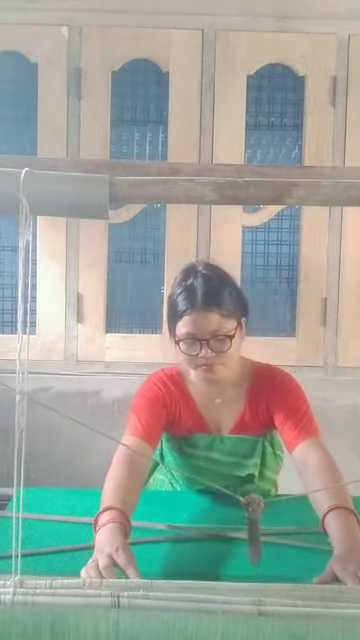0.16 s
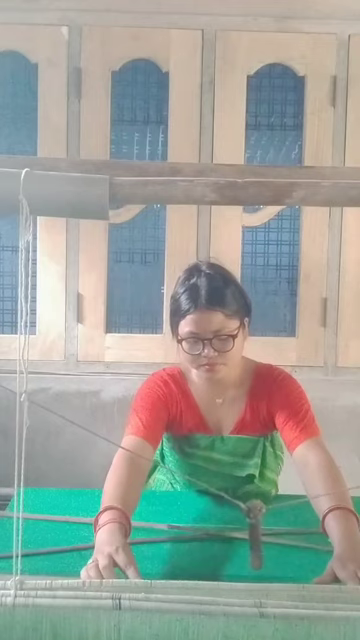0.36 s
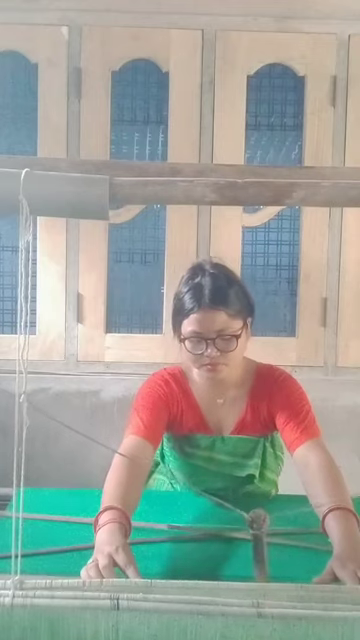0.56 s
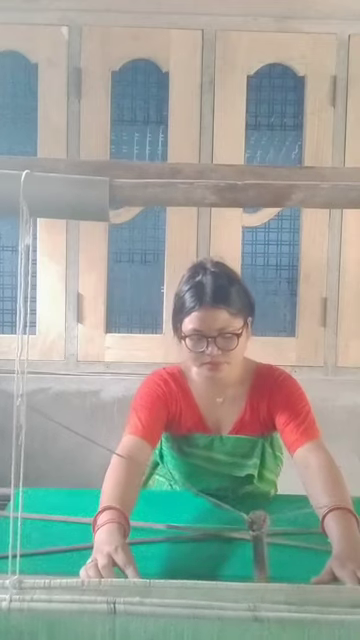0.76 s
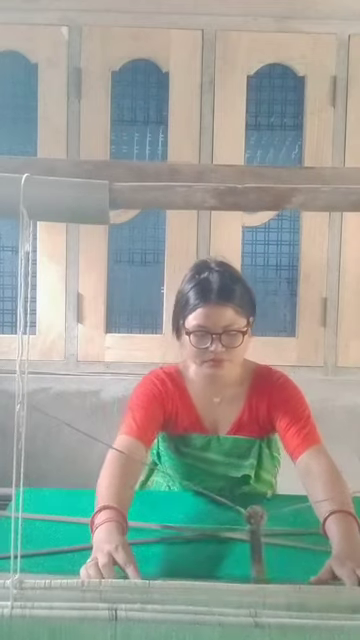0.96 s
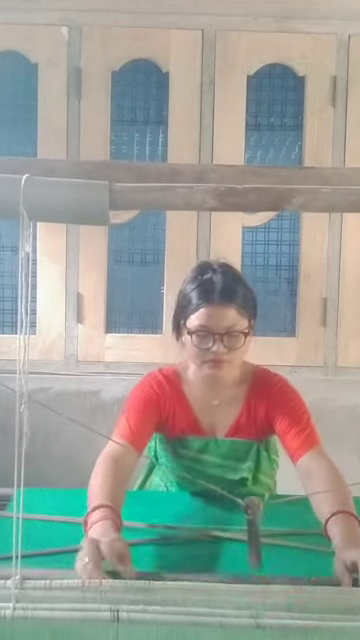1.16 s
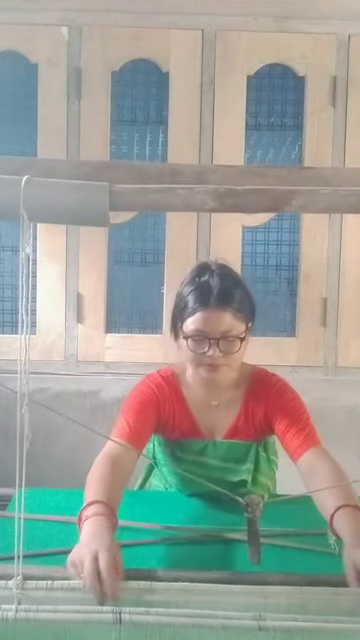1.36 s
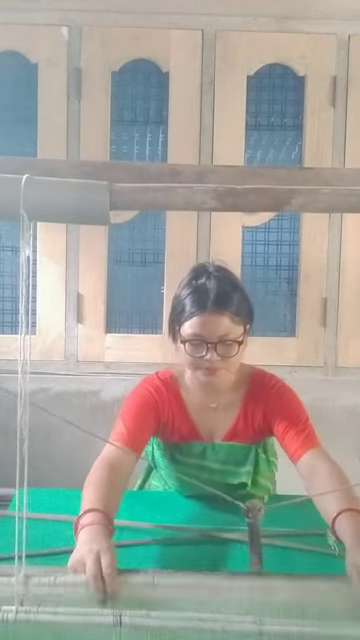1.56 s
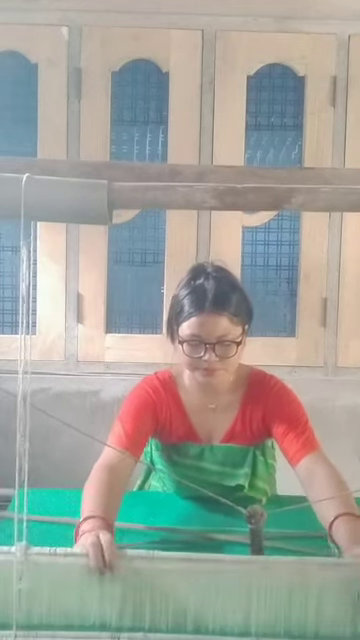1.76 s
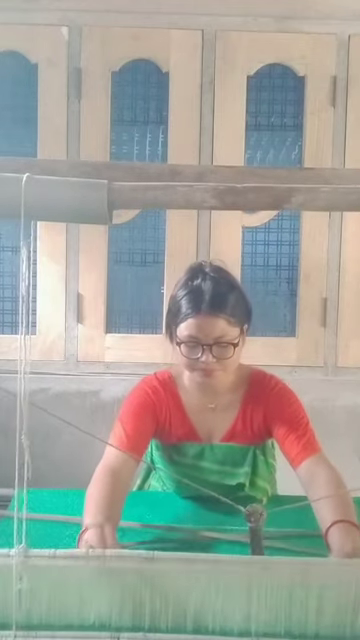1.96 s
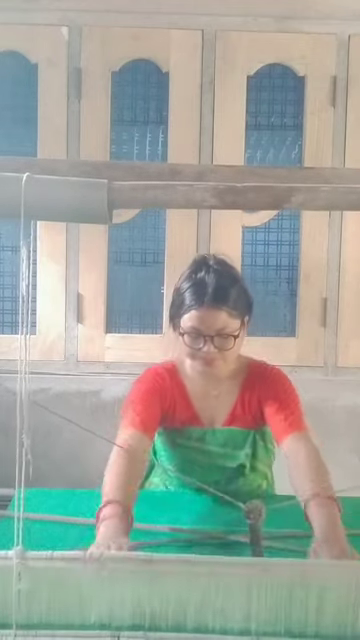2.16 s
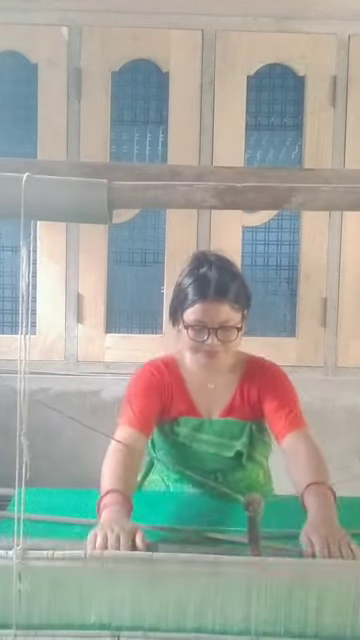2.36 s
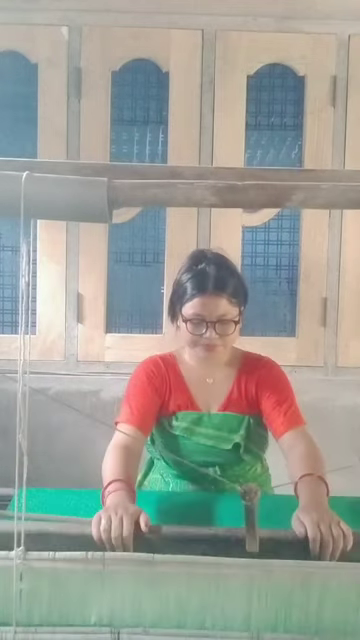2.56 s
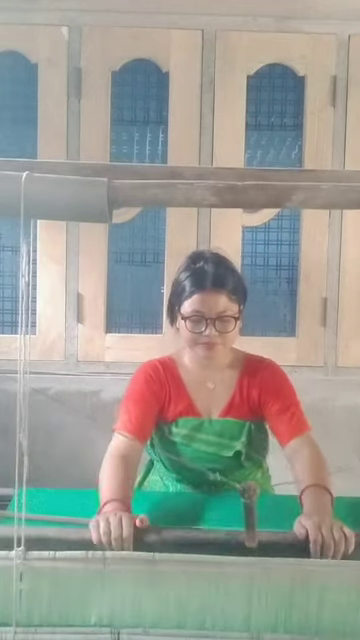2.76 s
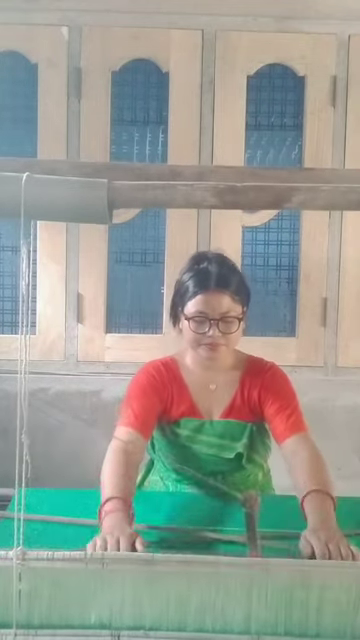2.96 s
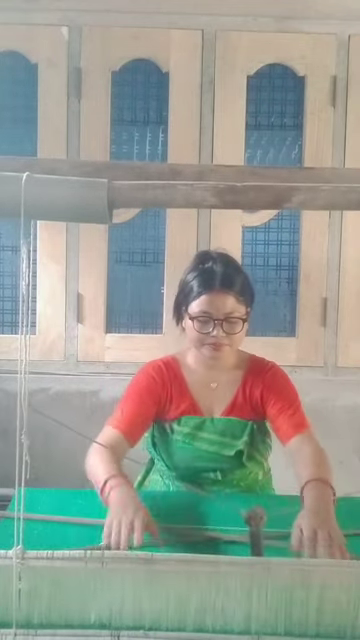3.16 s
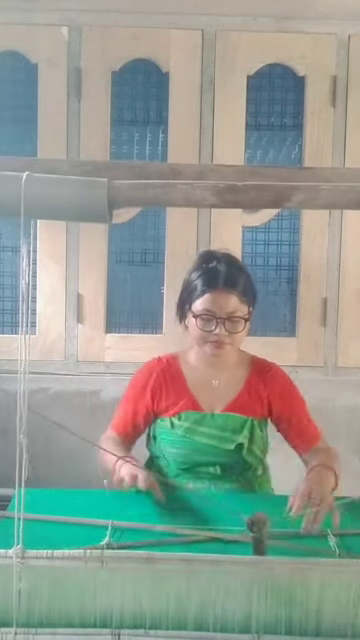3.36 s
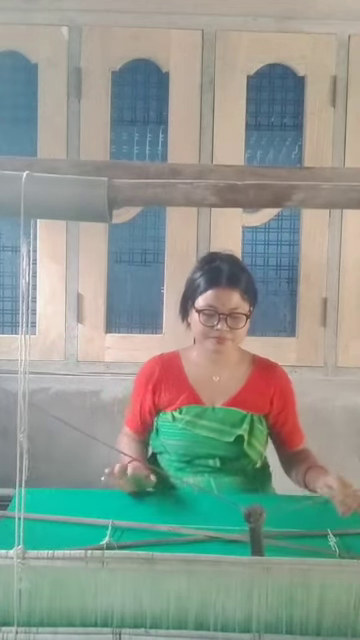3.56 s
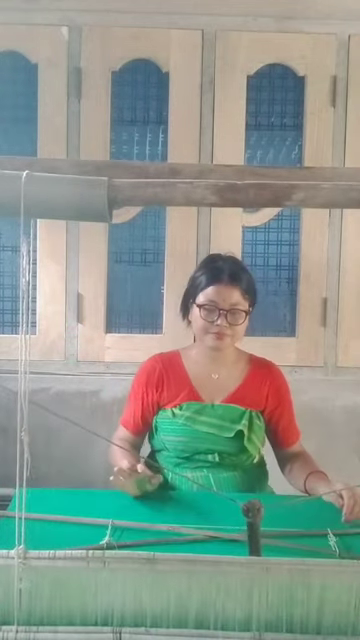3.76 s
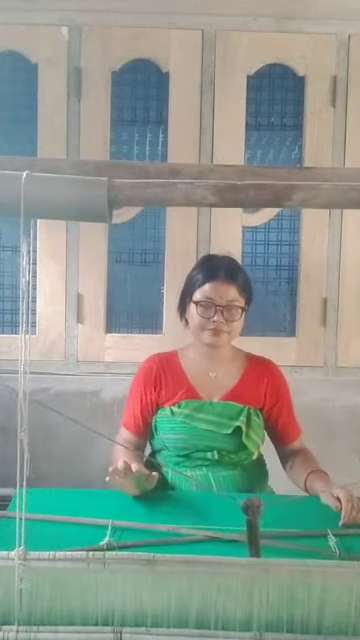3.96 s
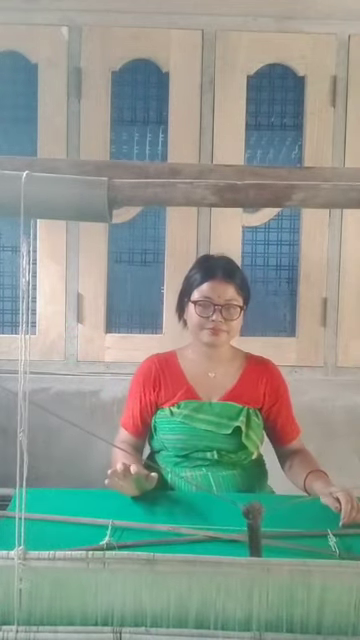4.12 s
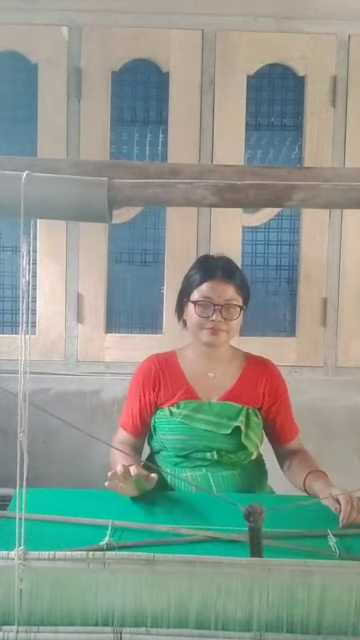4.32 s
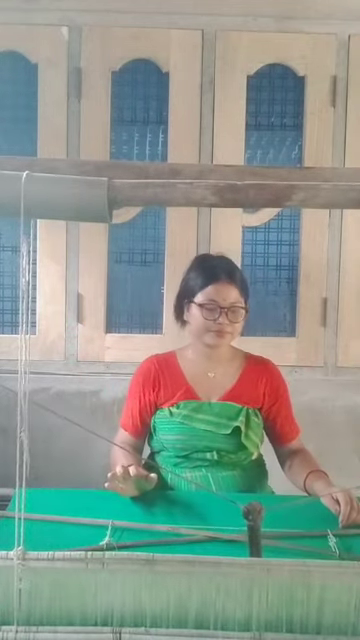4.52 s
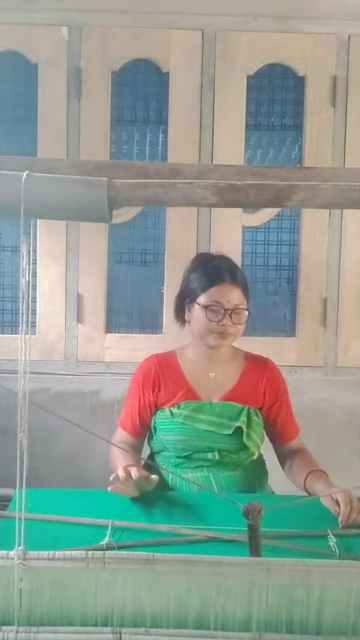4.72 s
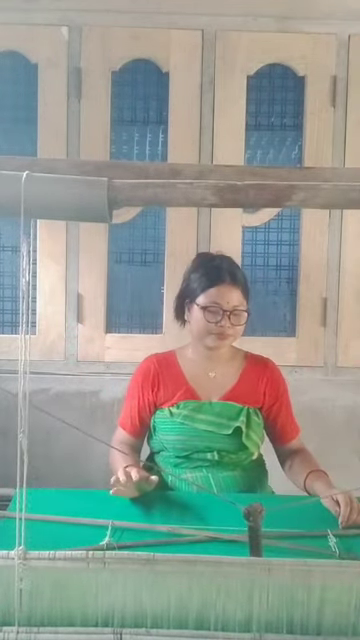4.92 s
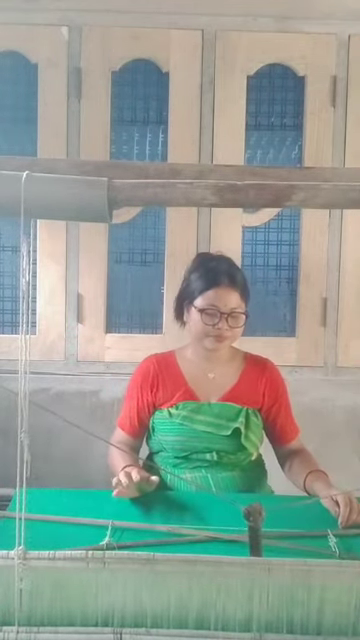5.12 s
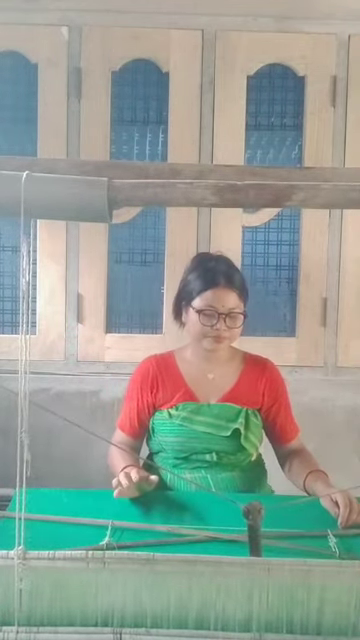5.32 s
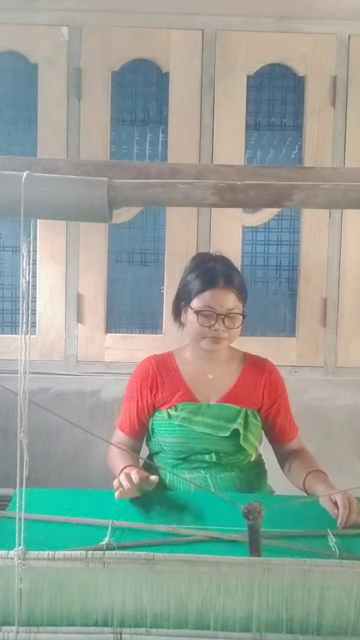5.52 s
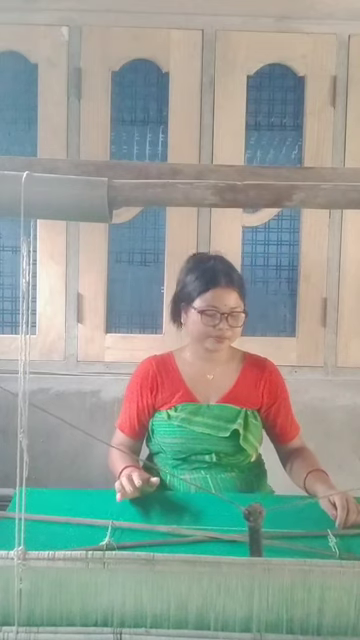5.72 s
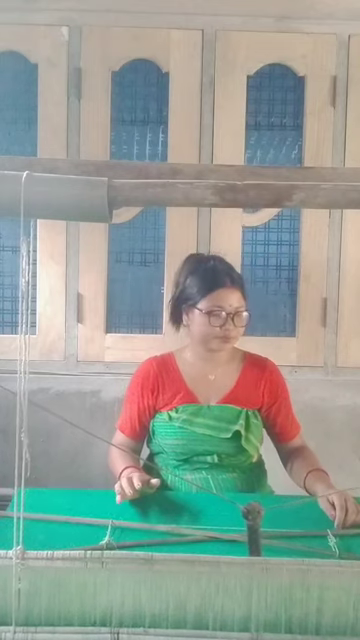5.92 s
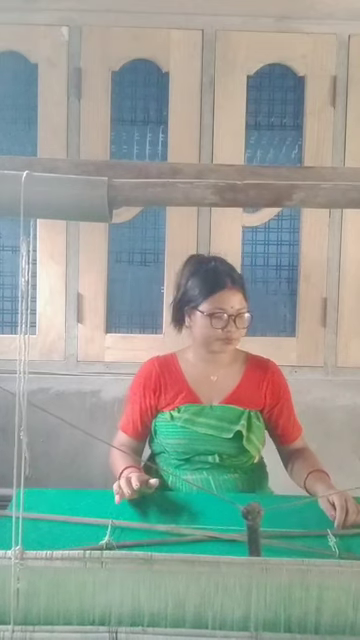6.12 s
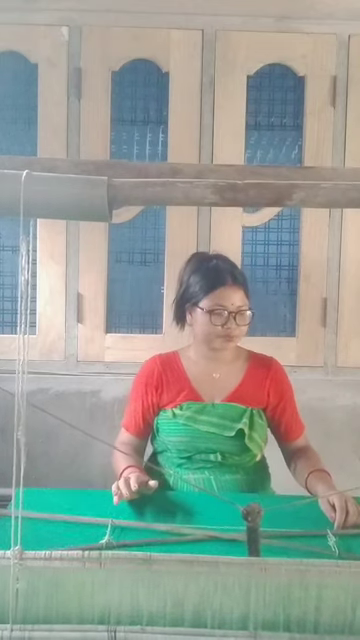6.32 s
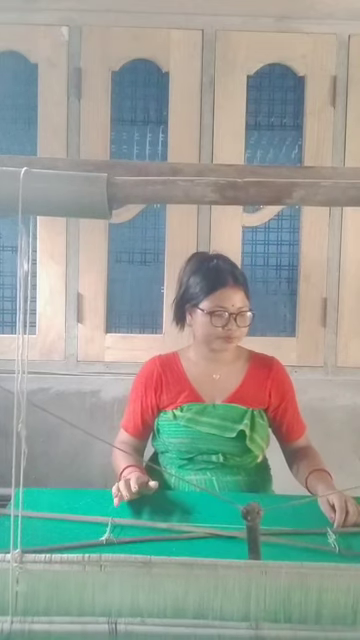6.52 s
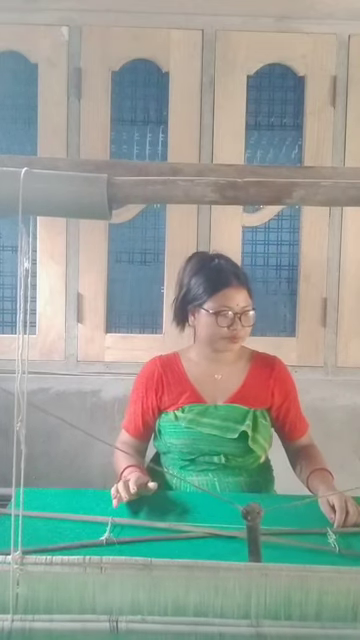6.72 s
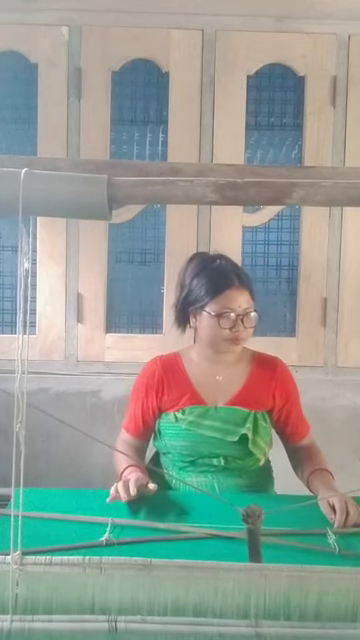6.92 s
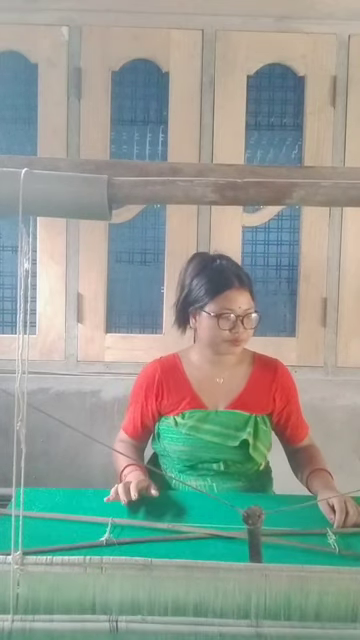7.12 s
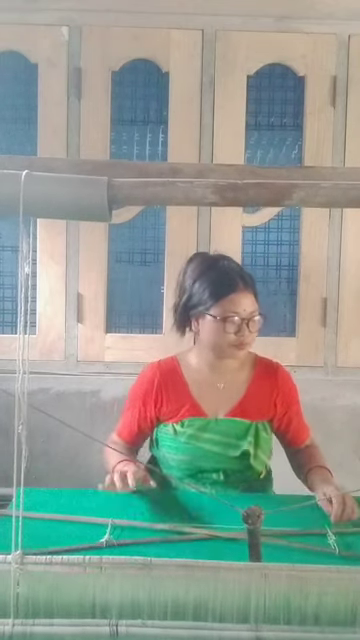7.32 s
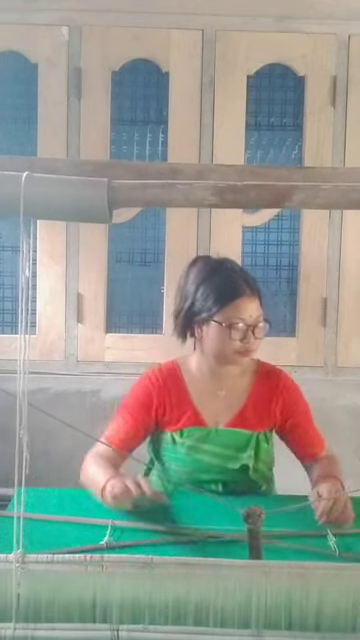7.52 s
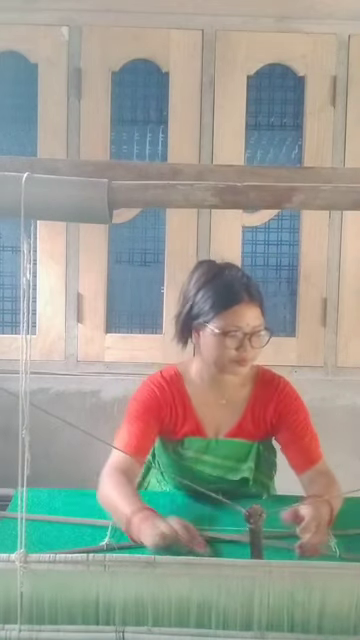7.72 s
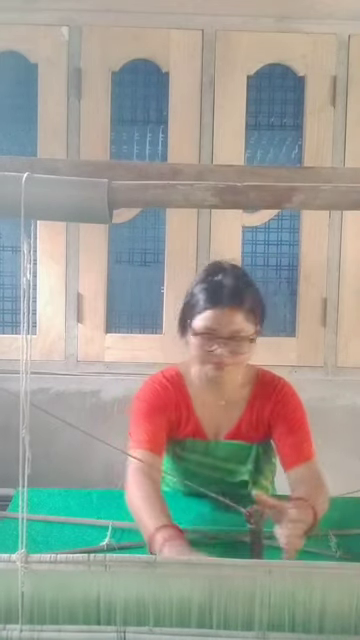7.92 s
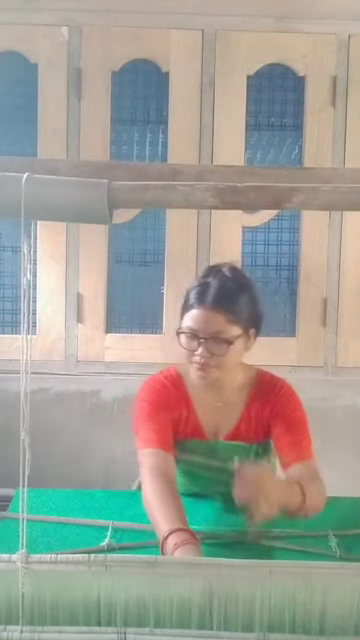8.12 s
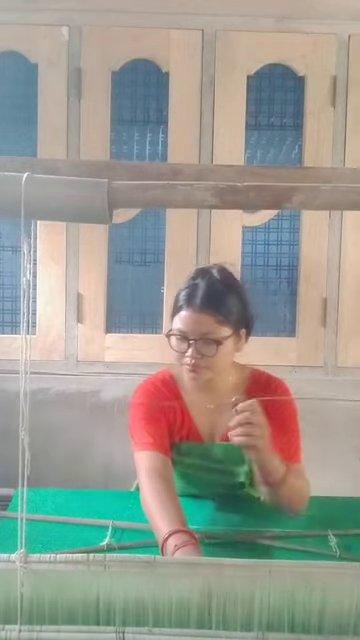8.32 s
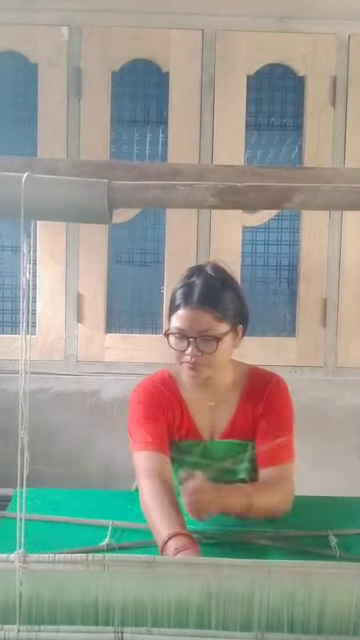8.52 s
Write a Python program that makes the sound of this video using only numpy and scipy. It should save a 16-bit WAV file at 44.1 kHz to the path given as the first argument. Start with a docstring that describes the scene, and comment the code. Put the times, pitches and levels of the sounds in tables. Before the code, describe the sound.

Close in a small hard-walled room, a wooden handloom starts nearly silent, then knocks and a sliding rasp of snapping threads lead into a double clatter of the beater. A very hard wooden slam follows, then a lighter beat. Sparse taps, ticks and dull treadle thuds continue, growing busier with sliding cords, until threads snap and a final beat closes.

```python
"""A wooden handloom worked by hand in a small hard-walled room.
Knocks and sliding threads lead to a rasp of snapping threads as the beater is pushed back.
It clatters against its stop, then is pulled hard onto the cloth, with a lighter beat soon after.
Hands, cords, rods and treadles then give knocks, ticks and thuds, until threads snap again and one beat closes.
Impacts are shaped noise and dying sines, slips are snaps with reed rings, and sliding is a dense grain of catches."""
import sys
import numpy as np
from scipy import signal
from scipy.fft import irfft
from scipy.io import wavfile

SR = 44100
rng = np.random.default_rng(int(sys.argv[2]) if len(sys.argv) > 2 else 0)


def generate_wav(sig):
    """Save sig (samples, or channels by samples) to the path in sys.argv[1] as 16-bit PCM at SR."""
    pcm = np.round(np.clip(np.atleast_2d(sig).T, -1, 1) * 32767).astype(np.int16)
    wavfile.write(sys.argv[1], SR, pcm)


N = 377937

# modes of the loom frame: pitch_hz [Hz], level_db [dB, relative]
FRAME = [(178, -2), (242, -1), (298, 0), (380, -3), (765, -7), (814, -6), (903, -4), (1155, -2), (1324, -1),
         (1476, -1), (1533, -2), (1665, -4), (1814, 1), (1844, 2), (1922, -4), (2081, 2), (2280, 0),
         (2600, 2), (3400, 4)]
# colour of the low body of a knock or thud: frequency_hz [Hz], density_db [dB per Hz, relative]
THUMP = [(30, -34.5), (60, -18), (95, -4), (180, -0.5), (320, 1.5), (520, -3.5), (900, -14.5),
         (3000, -51.5)]
# colour of a thread's snap and of hissing fibre: frequency_hz [Hz], density_db [dB per Hz, relative]
SNAP = [(80, -12.5), (200, -2.5), (1000, -2), (3100, 0), (4100, -6.5), (4900, 1), (7200, 4.5), (8200, -1.5),
        (13000, -6.5)]

TAPS = 4096  # length of the colouring clicks, samples
HZ = np.fft.rfftfreq(TAPS, 1 / SR)
AGE = np.arange(SR * 2 // 5) / SR  # seconds since an event began


def amp(db):
    """Decibels to gain."""
    return 10 ** (np.asarray(db) / 20)


def unit(x):
    """Scales to energy 1 along time."""
    return x / np.linalg.norm(x, axis=-1, keepdims=True)


def read(points, hz):
    """Reads a table on a log-frequency axis."""
    f, value = np.transpose(points)
    return np.interp(np.log(hz + 1), np.log(f), value)


def add(mix, s, sound):
    """Mixes a sound in at time s."""
    part = mix[:, max(round(s * SR), 0):][:, :sound.shape[-1]]
    part += sound[..., :part.shape[-1]]


def colour(points, extra_db=0):
    """A gain for each frequency, with mean power 1."""
    gain = amp(read(points, HZ) + extra_db)
    return gain / np.sqrt(np.mean(gain ** 2))


def click(*gains):
    """The causal (minimum-phase) click whose power spectrum is the sum of the given parts."""
    power = sum(g ** 2 for g in gains)
    log_gain = np.log(power + 1e-14) / 2
    circle = np.concatenate([log_gain, log_gain[-2:0:-1]])
    spectrum = np.exp(np.conj(signal.hilbert(circle)))
    return irfft(spectrum[:len(HZ)])


def through(x, response):
    """Convolves both channels with one response."""
    return signal.fftconvolve(x, response[None], axes=1)[:, :x.shape[1]]


def ring(modes, rise_s=0.001):
    """Dying sines, struck with random sign, that take a moment to build; energy 1."""
    sines = 0
    for hz, db, t60 in modes:
        decay = amp(db - 60 * AGE / t60)
        sines = sines + rng.choice([-1, 1]) * decay * np.sin(2 * np.pi * hz * AGE)
    return unit(sines * (1 - np.exp(-AGE / rise_s)))


def contact(first_db, chatter_t60, rise_s, room_db):
    """One impact inside a swelling chatter of loose parts, and the room's tail, at two microphones."""
    # decay of the room's tail: frequency_hz [Hz], t60_s [s]
    room_decay = [(100, 0.42), (400, 0.31), (1000, 0.21), (2500, 0.2), (7000, 0.18), (13000, 0.23)]
    tail_rise_s = 0.0054
    tiny = rng.standard_normal(len(AGE)) * (rng.random(len(AGE)) < 1 / 10)
    near = unit(tiny * amp(-60 * AGE / chatter_t60) * (1 - np.exp(-AGE / rise_s)))
    near[round(rise_s * SR)] += amp(first_db)
    # the tail is noise that dies at its own pace in each band, independent at each microphone
    hz, t, z = signal.stft(rng.standard_normal((2, len(AGE))), SR, nperseg=256)
    dying = z * amp(-60 * t / read(room_decay, hz)[:, None])
    tail = signal.istft(dying, SR, nperseg=256)[1][:, :len(AGE)]
    tail = unit(tail * (1 - np.exp(-AGE / tail_rise_s)))
    return unit(near + amp(room_db) * tail)


def drift(per_s):
    """Slow random wander: straight lines between per_s random points of spread 1 each second."""
    knots = rng.standard_normal(N // 100)
    return np.interp(np.arange(N) / SR * per_s, np.arange(len(knots)), knots)


def air(air_db=-63.5, swell_db=-2.05, shrill_db=-88, shrill_swell_db=8):
    """The room's quiet, restless background noise, and a faint high shrill that comes and goes."""
    # colour of the background: frequency_hz [Hz], density_db [dB per Hz, relative]
    air_colour = [(30, -17), (65, -17), (97, 6), (135, -4.5), (200, 2.5), (480, -13), (1300, -16.5),
                  (2100, -10.5), (2500, -21), (3100, -30), (4000, -32), (6200, -31), (8500, -47.5),
                  (13000, -38)]
    # colour of the faint high band: frequency_hz [Hz], density_db [dB per Hz, relative]
    shrill_colour = [(8500, -48.5), (10100, -10), (10550, -0.5), (11000, -13), (12500, -49)]
    room = through(rng.standard_normal((2, N)), click(colour(air_colour)))
    shrill = through(rng.standard_normal((2, N)), click(colour(shrill_colour)))
    room_gain = amp(air_db + swell_db * drift(17))
    shrill_gain = amp(shrill_db + shrill_swell_db * np.tanh(drift(9)))
    return room_gain * room + shrill_gain * shrill


def rubbing():
    """Gains of hiss and scrape: every rub starts, its hiss grows, and it dies away over a restless rustle."""
    # threads and hands slide over the loom: start_s [s], length_s [s],
    # hiss_db, scrape_db [dB, before the trims in sliding()]
    rub_rows = [(0, 0.7, -76.5, -62), (.04, .03, -66, -68), (.70, .36, -53.5, -47),
                (1.12, 0.47, -61.5, -59), (1.669, .15, -40, -37), (1.9, .3, -95, -61),
                (2.22, .33, -70, -57), (2.544, .06, -64, -35), (2.9, .38, -73, -59.5),
                (3.568, 0.13, -65.5, -62), (4.15, .09, -80, -63), (4.347, 0.063, -76, -67),
                (5.662, 0.2, -78, -66.5), (6.261, 0.081, -63, -52.5), (6.446, .25, -58, -52),
                (6.934, 0.13, -78, -68), (7.047, 0.028, -69, -48), (7.393, 0.12, -56.5, -49.5),
                (7.6, .1, -61, -63), (8.07, .05, -66, -62)]
    attack_s, release_db_per_s = .025, 170
    hiss_swell_db = 4.5  # the hiss grows by this much as a stroke gathers speed
    # the cloth is never quite still
    rustle_hiss_db, rustle_scrape_db, rustle_swell_db = -89, -76, 4.5
    gains = amp(np.array([[rustle_hiss_db], [rustle_scrape_db]]) + rustle_swell_db * drift(9))
    for s, length, hiss, scrape in rub_rows:
        t = np.arange(SR + round(length * SR)) / SR
        release = amp(-release_db_per_s * np.maximum(t - length, 0))
        stroke = np.minimum(t / attack_s, 1) * release
        swell_db = hiss_swell_db * (np.minimum(t / length, 1) - .5)
        add(gains, s, np.array([amp(hiss + swell_db) * stroke, amp(scrape) * stroke]))
    return gains


def sliding(hiss_db=-1, scrape_db=-1, grain_db=4.5, grains_per_s=2500, uneven_db=2.0):
    """Many tiny catches of fibre hiss in the threads and scrape in the wood."""
    # colour of the scrape: frequency_hz [Hz], density_db [dB per Hz, relative]
    scrape_colour = [(100, -9.5), (300, -7.5), (700, -0.5), (1300, -0.5), (1900, 2), (2400, 4),
                     (2900, -10.5), (4000, -23), (8000, -62)]
    size_db = grain_db * np.minimum(rng.exponential(1, N), 5)
    sizes = amp(size_db) * (rng.random(N) < grains_per_s / SR)
    grains = sizes * rng.standard_normal(N) * amp(uneven_db * drift(45))
    touch = contact(first_db=-2, chatter_t60=0.041, rise_s=0.0011, room_db=5)
    heard = signal.fftconvolve(grains[None], touch, axes=1)[:, :N]
    heard = unit(heard) * np.sqrt(N)  # mean power 1
    hiss = through(heard, click(colour(SNAP)))
    scrape = through(heard, click(colour(scrape_colour)))
    hiss_gain, scrape_gain = rubbing()
    return hiss * hiss_gain * amp(hiss_db) + scrape * scrape_gain * amp(scrape_db)


def rod(level_db=24):
    """A loose rod is jogged and rings in its bending modes."""
    # jogs of the rod: start_s [s], level_db [dB, before the layer's make-up]
    rod_taps = [(0.699, -26), (0.997, -35.5)]
    # modes of the rod: pitch_hz [Hz], level_db [dB, relative], t60_s [s]
    rod_modes = [(736, -14, 0.26), (790, -32, 0.48), (2190, -12, 0.12)]
    out = np.zeros((2, N))
    for s, db in rod_taps:
        add(out, s, amp(db + level_db) * ring(rod_modes, rise_s=0.0019))
    return out


def fidgets(db, hz, count, spread_db=2, spread_octaves=.4):
    """Faint touches as the hands rest on the cloth and shift: (start_s, level_db, pitch_hz)."""
    from_s, to_s = 4.9, 5.2
    places = np.linspace(from_s, to_s, count + 1)
    times = rng.uniform(places[:-1], places[1:])
    touches = []
    for s, (force, part) in zip(times, rng.standard_normal((count, 2))):
        touches.append((s, db + spread_db * force, hz * 2 ** (spread_octaves * part)))
    return touches


def thuds(level_db=22, width_octaves=0.25):
    """Soft pushes on treadles and frame boom briefly in the room, each around its own pitch."""
    # dull thuds of treadles and frame: start_s [s], level_db [dB, before make-up], pitch_hz [Hz]
    thud_rows = [(0.213, -42, 212), (3.374, -40.5, 111), (3.543, -46, 245), (4.70, -43, 195),
                 (4.936, -45.5, 237), (5.057, -47, 186), (5.142, -47, 105), (5.295, -46.5, 239),
                 (5.837, -48, 230), (6.254, -41, 202), (7.062, -34, 224), (7.087, -40, 183),
                 (7.464, -36, 202)]
    out = np.zeros((2, N))
    for s, db, hz in thud_rows + fidgets(db=-56, hz=160, count=4):
        octaves_off = np.log2((HZ + 1) / hz)
        hump_db = -10 * np.log10(1 + (octaves_off / width_octaves) ** 4)
        push = contact(first_db=8.5, chatter_t60=0.17, rise_s=.004, room_db=-3.0)
        boom = through(push, click(colour(THUMP, hump_db)))
        add(out, s, amp(db + level_db) * boom)
    return out


def catches(count=4):
    """The strong slips, and faint strays scattered through each draw: (start_s, snap_db, twang_db)."""
    # a taut thread or cord catches and slips: start_s [s], snap_db [dB, before make-up]
    slip_rows = [(0.8938, -30), (0.9247, -32), (0.9464, -29), (0.977, -30.5), (1.0284, -29), (1.062, -30),
                 (1.074, -29), (1.101, -27.5), (1.1533, -29.5), (1.1918, -30), (1.28, -28), (1.3227, -29),
                 (1.4436, -32.5), (1.4689, -23.5), (1.514, -26), (1.5915, -26.5), (1.6524, -26.5),
                 (1.923, -37.5), (6.318, -44), (6.4624, -41), (7.059, -38), (7.464, -35), (7.5172, -38),
                 (7.538, -39), (7.6174, -35.5), (7.6605, -36.5), (7.7018, -32), (8.115, -23.5),
                 (8.124, -23.5)]
    # threads drawn tight keep catching: start_s [s], end_s [s], stray_db [dB, before make-up]
    draw_rows = [(.71, 1.1, -36), (1.15, 1.62, -40), (7.46, 7.72, -41)]
    stray_spread_db = 3  # stray slips differ in strength
    # twang re snap at middling force, before the trim in slips(); hard slips are brighter
    middling_db, twang_db, twang_fall_db_per_db = -29, 3, 0.39
    strays = []
    for start, end, db in draw_rows:
        for k in range(count):
            s = start + (end - start) * (k + rng.random()) / count
            strays.append((s, db + stray_spread_db * rng.standard_normal()))
    return [(s, db, twang_db - twang_fall_db_per_db * (db - middling_db)) for s, db in slip_rows + strays]


def slips(level_db=13, twang_db=-2, reed_db=-3, room_db=0):
    """A caught thread lets go: a bright snap, a broad twang, and a short ring of the plucked reed."""
    # colour of the twang: frequency_hz [Hz], density_db [dB per Hz, relative]
    twang_colour = [(500, -31.5), (1300, -15.5), (1480, 0.5), (1720, -4.5), (1900, -7.5), (2250, -4.5),
                    (2700, -11), (3200, -18), (4000, -26.5)]
    # modes of the reed: pitch_hz [Hz], level_db [dB, relative], t60_s [s]
    reed_modes = [(1510, 3.5, 0.059), (1620, 0.5, 0.066), (2216, -3.5, 0.066), (3040, -7, 0.06)]
    out = np.zeros((2, N))
    for s, db, twang in catches():
        release = contact(first_db=-16, chatter_t60=.04, rise_s=.002, room_db=room_db)
        snap = click(colour(SNAP), amp(twang + twang_db) * colour(twang_colour))
        sound = through(release, snap)
        sound += amp(twang + reed_db) * ring(reed_modes, rise_s=.004)
        add(out, s, amp(db + level_db) * sound)
    return out


def taps(thud_db=-12, tick_db=-12, ring_db=-6):
    """Fingers tap the wood in passing."""
    touches = fidgets(db=-55, hz=1810, count=4)
    return [(s, db, thud_db, tick_db, hz, ring_db) for s, db, hz in touches]


def rattles(count=6):
    """Each beat takes up slack with a light touch, lands, rocks end to end while pressed home, then settles."""
    # the beater hits its stop or the cloth: start_s [s], level_db [dB, before make-up], slack_s [s],
    # rebound_gap_s [s], rebound_db [dB re blow], rattle_s [s], thud_db, tick_db [dB re blow, before trims],
    # pitch_hz [Hz, struck part], ring_db [dB re blow]
    beat_rows = [(1.669, -9.5, 0.0038, 0.018, -5, .03, -10, -20, 994, -10),
                 (1.737, -5.5, 0.0046, .0225, .5, .045, -16, -23, 850, -6),
                 (2.581, -1.3, .0155, .0193, 1.5, .08, -25, -29, 1750, -11),
                 (3.263, -9, .008, .012, -8, 0, -17, -35, 1464, -6),
                 (8.487, -10, .008, 0.0093, -4, 0, -32, -39, 1330, -3)]
    first_touch_db, settle_db_per_s = -8, 330  # first touch re the blow; how fast a rattle dies
    far_end_db = -4  # the beater's two ends rebound in turn, one more lightly
    # rebounds come unevenly and land on different parts
    jitter_s, part_spread_octaves = .0007, .3
    parts_hz = np.transpose(FRAME)[0]
    rows = []
    for s, db, slack, gap, rebound_db, length, thud, tick, hz, ring_db in beat_rows:
        # the first touch is softer, but its tick is as strong as the blow's
        rows.append((s - slack, db + first_touch_db, thud, tick - first_touch_db, hz, ring_db))
        rows.append((s, db, thud, tick, hz, ring_db))
        for k, (late, aim) in enumerate(rng.uniform(-1, 1, (count, 2)), 1):
            settled_db = settle_db_per_s * max(k * gap - length, 0)
            fall_db = rebound_db + far_end_db * (k % 2) - settled_db
            # the frame mode nearest to where this rebound lands
            octaves = np.log2(parts_hz / hz)
            part_hz = parts_hz[np.argmin(abs(octaves - part_spread_octaves * aim))]
            rows.append((s + k * gap + jitter_s * late, db + fall_db, thud, tick, part_hz, ring_db))
    return rows


def knocks(level_db=15, thud_db=4, tick_db=1, focus_db=7, focus_octaves=0.24,
           frame_db=-14, part_t60=0.098, light_t60=0.17):
    """Each blow favours the struck part's range, with a thud below and a tick above; part and frame ring on."""
    # knocks of shuttle, rods and hands on wood: start_s [s], level_db [dB, before make-up],
    # thud_db, tick_db [dB re blow, before trims], pitch_hz [Hz, struck part], ring_db [dB re blow]
    knock_rows = [(0.475, -42.5, -27, -4.5, 2160, -11), (0.699, -24, -30, -19.5, 2060, -18),
                  (0.791, -25.5, -29, -15, 1250, -6), (0.997, -25.5, -11, -19, 770, 0.5),
                  (1.246, -16.5, -17, -35, 1544, -5), (1.377, -27, -15.5, -12.5, 2520, -16),
                  (2.859, -22, -24, -32, 1476, -10), (2.965, -33, -6, -35, 1154, -4),
                  (3.511, -37, -9.5, -32, 1300, -5), (3.967, -37, -9.5, -10, 1895, -9),
                  (4.035, -43, -19.5, -8.5, 1990, -8), (4.685, -42.5, -11.5, -11.5, 1137, -8),
                  (4.929, -40.5, -14, -16.5, 1990, -13), (5.296, -36, -12, -19, 2280, 0),
                  (5.346, -42, -20, -32, 2110, 0), (5.565, -32, -17, -10, 2070, -4.5),
                  (6.039, -33.5, -28, -8.5, 2290, -11), (6.17, -45, -11, -28, 1100, -14),
                  (6.396, -35, -5.5, -6.5, 1633, -2.5), (6.534, -30, -26, -15, 2200, -2),
                  (6.63, -23, -27, -22, 1245, -3), (6.704, -35, -11, -25, 779, 1),
                  (7.042, -27, -8, -30, 766, -7), (7.061, -33, -8, -22, 731, -1),
                  (7.388, -24, -11, -25.5, 1880, -7), (7.423, -37, 0, -14, 710, 2),
                  (7.467, -27, -15, -15, 2140, -14), (8.041, -30.5, -9, -40, 1464, -5.5),
                  (8.118, -30, -16, -15, 1576, -11)]
    # colour of the woody middle: frequency_hz [Hz], density_db [dB per Hz, relative]
    wood_colour = [(150, -36.5), (420, -11.5), (660, -8), (850, -0.5), (1400, -4), (2200, -2.5), (2600, -9),
                   (3000, -16.5), (3450, -22), (4000, -31), (5200, -31.5), (7500, -54.5)]
    # colour of the tick: frequency_hz [Hz], density_db [dB per Hz, relative]
    tick_colour = [(1500, -37), (3000, -1), (4000, -2), (5000, 1.5), (7000, 0), (8200, -8), (13000, -14.5)]
    out = np.zeros((2, N))
    frame_modes = [(hz, db, .19) for hz, db in FRAME]  # all with a t60 of 0.19 s
    for s, db, thud, tick, hz, ring_db in rattles() + knock_rows + taps():
        # a hard blow presses the parts together and damps them; a lightly touched part rings longer
        t60 = np.interp(db, [-35, -15], [light_t60, part_t60])
        focus = focus_db * np.exp(-(np.log2((HZ + 1) / hz) / focus_octaves) ** 2)
        blow = click(colour(wood_colour, focus), amp(thud + thud_db) * colour(THUMP))
        first_db = np.interp(db, [-25, -5], [-5, -1])  # hard blows land in one crack, light ones scuff
        impact = contact(first_db, chatter_t60=0.091, rise_s=.001, room_db=1.5)
        sound = through(impact + amp(frame_db) * ring(frame_modes), blow)
        sound += amp(ring_db) * ring([(hz, 0, t60)])
        # jolted threads tick just after the blow
        shaken = contact(first_db=-19, chatter_t60=.06, rise_s=.004, room_db=-0.5)
        sound += amp(tick + tick_db) * through(shaken, click(colour(tick_colour)))
        add(out, s, amp(db + level_db) * sound)
    return out


def scene():
    """The whole loom in its room."""
    return air() + sliding() + rod() + thuds() + slips() + knocks()


def record(dry, side_db=-8, split_hz=3900, low_cut_hz=70, edge_hz=13300):
    """One microphone feeds both channels; the other adds width in the treble; then low cut and band limit."""
    side_lag = 24  # samples
    treble = signal.butter(12, split_hz, "high", fs=SR, output="sos")
    side = amp(side_db) * signal.sosfilt(treble, np.roll(dry[1], side_lag))
    low_cut = signal.butter(3, low_cut_hz, "high", fs=SR, output="sos")
    pair = signal.sosfilt(low_cut, [dry[0] + side, dry[0] - side])
    band_limit = signal.firwin(511, edge_hz, window=("kaiser", 9), fs=SR)
    return signal.oaconvolve(pair, band_limit[None], "same")


dry = scene()
out = record(dry)
generate_wav(out)
```